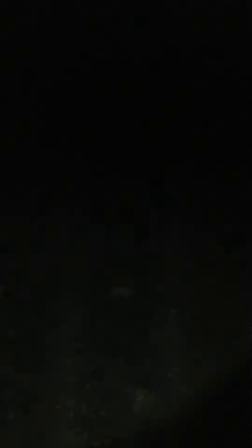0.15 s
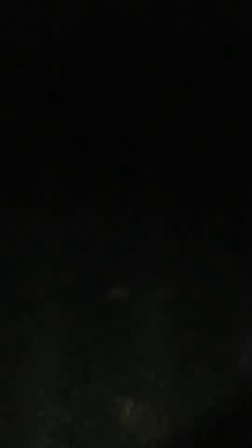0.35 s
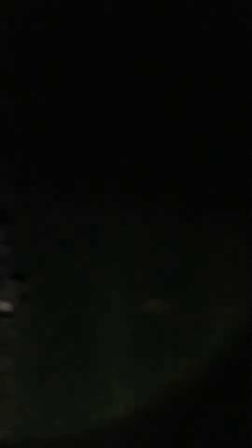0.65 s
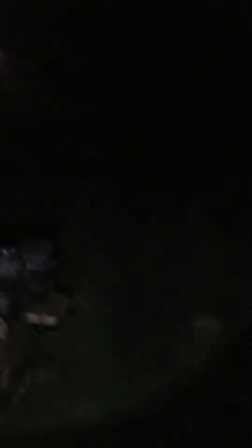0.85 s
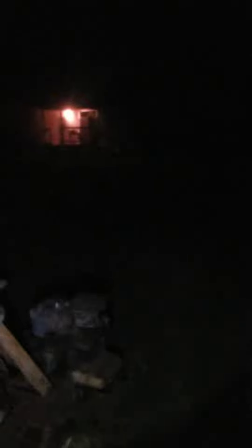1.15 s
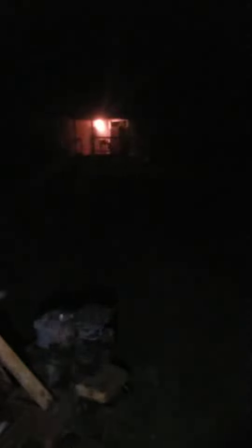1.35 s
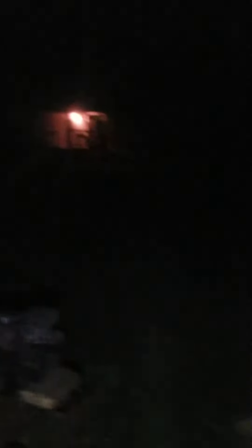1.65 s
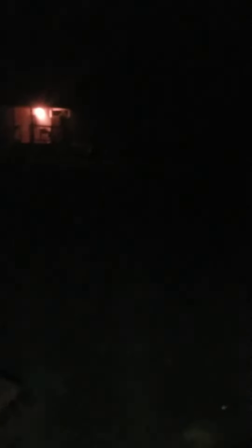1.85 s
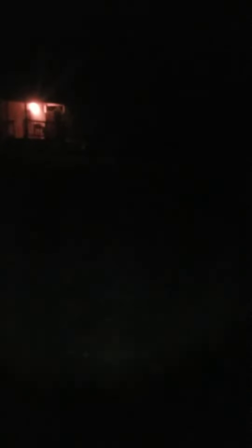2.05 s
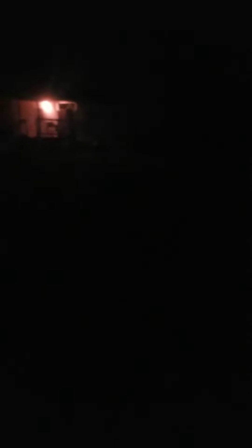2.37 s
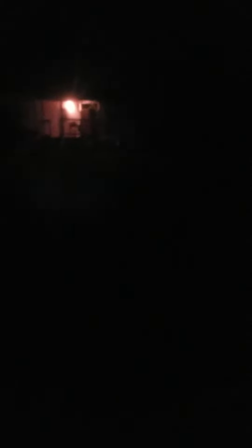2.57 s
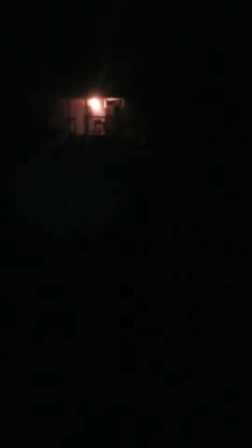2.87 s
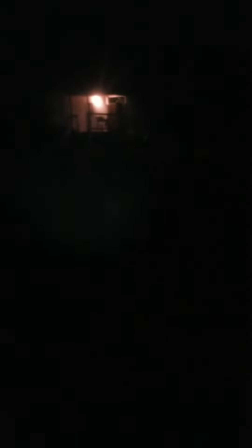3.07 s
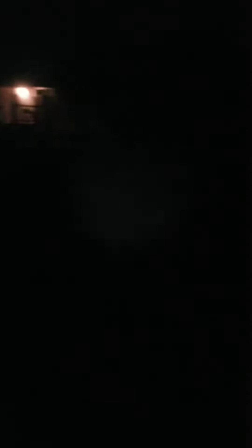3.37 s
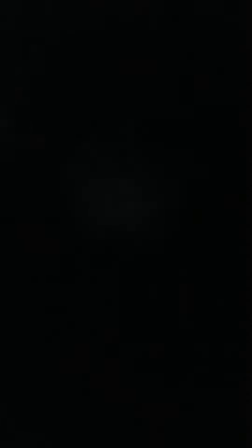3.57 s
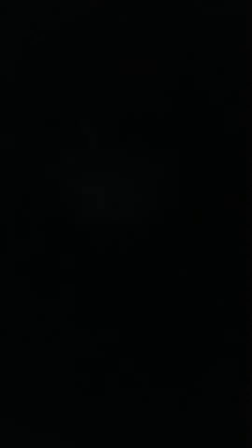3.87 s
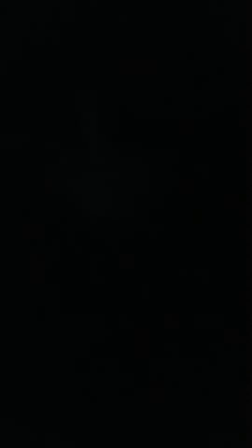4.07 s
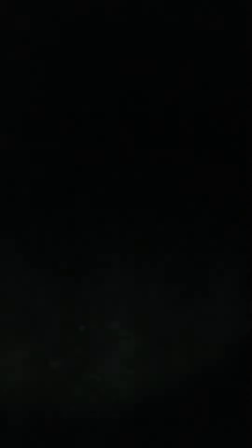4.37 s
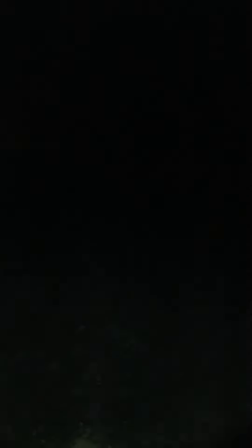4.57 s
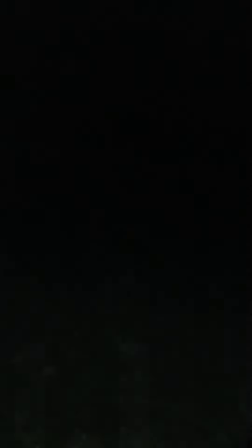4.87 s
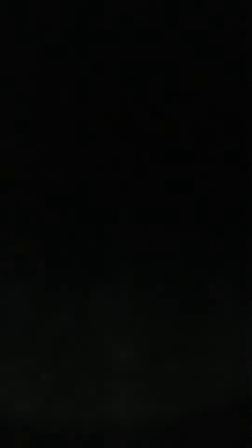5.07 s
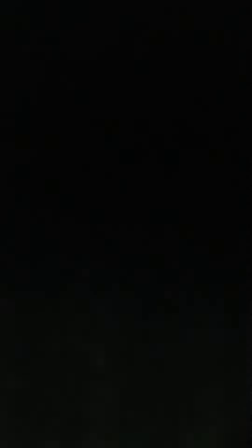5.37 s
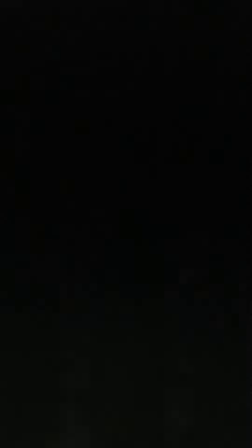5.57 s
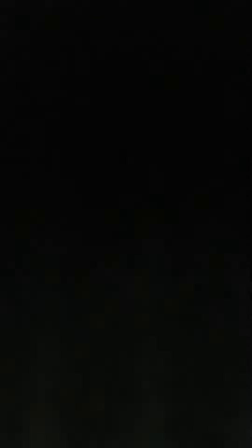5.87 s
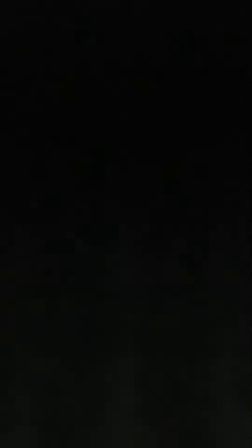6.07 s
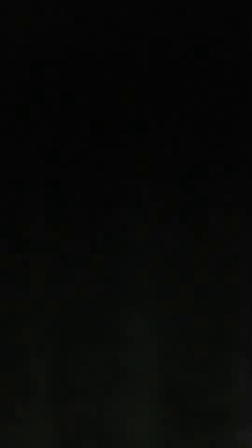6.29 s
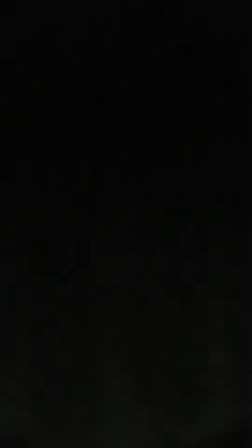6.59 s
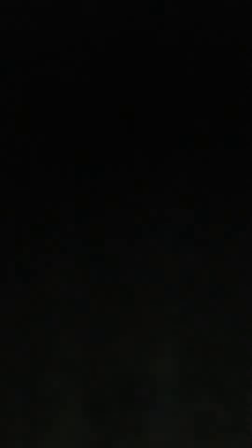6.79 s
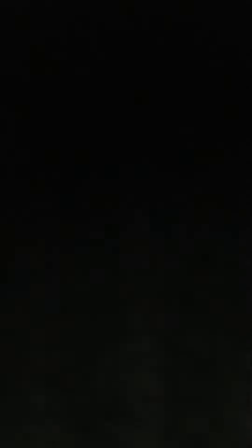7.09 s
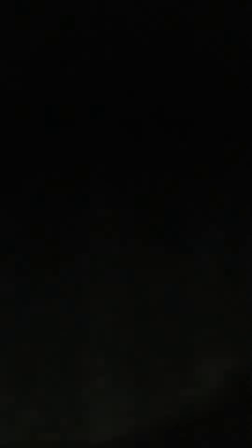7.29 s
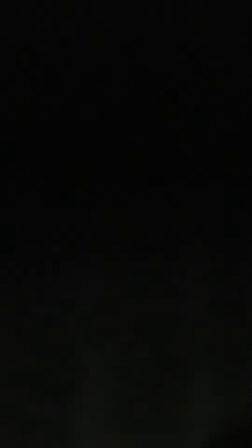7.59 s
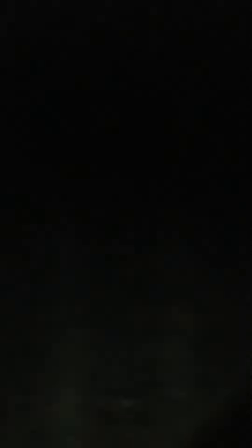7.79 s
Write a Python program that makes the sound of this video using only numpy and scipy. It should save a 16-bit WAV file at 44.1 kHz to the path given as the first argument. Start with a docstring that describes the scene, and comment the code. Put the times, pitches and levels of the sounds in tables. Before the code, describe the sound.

Steady shrill cricket chorus in a dark garden, broken by loud close clicks at the right, skin rustle, soft thuds and grassy steps.

```python
"""A field of crickets trilling near 4 kHz in a garden at night, with a walker close by in the grass throughout.
Fingers rub and knock on a hand-held phone, mostly by its right microphone port; a near, higher cricket sings two bouts.
Crickets are falling tone pulses blurred by foliage; grass, skin and grit are filtered random snaps;
knocks, thuds and clacks are struck resonances; the squeak is a sagging tone and the air is coloured noise."""
import sys
import numpy as np
from scipy import signal
from scipy.fft import rfft, irfft, next_fast_len
from scipy.io import wavfile

SR = 44100
rng = np.random.default_rng(int(sys.argv[2]) if len(sys.argv) > 2 else 0)


def inscribe(sig):
    """Save sig as 16-bit PCM at rate SR to the path in sys.argv[1].

    A 1-D sig is mono; a 2-D sig holds one channel per row.
    Samples are clipped to [-1, 1] before scaling.
    """
    pcm = np.round(np.clip(np.atleast_2d(sig).T, -1, 1) * 32767)
    wavfile.write(sys.argv[1], SR, pcm.astype(np.int16))


N = 350154  # length in samples


def from_db(db):
    """Decibels to gain."""
    return 10 ** (np.asarray(db) / 20)


def rms_one(x):
    """Scale to unit power over the whole signal."""
    return x / np.sqrt(np.mean(x ** 2) + 1e-20)


def clock():
    """Time of every sample in seconds."""
    return np.arange(N) / SR


def in_time(rows):
    """Each column of a curve at every sample; the end values hold outside it."""
    t, *columns = np.transpose(rows)
    return [np.interp(clock(), t, column) for column in columns]


def drift(rate):
    """Random wander between normal draws of spread 1, `rate` draws a second."""
    knots = rng.standard_normal(8192)
    return np.interp(clock() * rate, np.arange(len(knots)), knots)


def coloured(x, spectrum):
    """Filter a signal by a spectrum of (f/Hz, level/dB); unit power."""
    hz, db = np.transpose(spectrum)
    size = next_fast_len(N)
    bins_hz = np.fft.rfftfreq(size, 1 / SR)
    gain = from_db(np.interp(np.log(bins_hz + 1), np.log(hz), db))
    return rms_one(irfft(rfft(x, size) * gain, size)[..., :N])


def grains(per_s, spread_db):
    """Tiny snaps of uneven size at random moments; unit power."""
    sizes = from_db(spread_db * np.minimum(rng.exponential(1, N), 4)) * rng.standard_normal(N)
    return rms_one(sizes * (rng.random(N) < per_s / SR))


def ring(x, hz, width_hz):
    """One resonance; a wider one dies sooner."""
    r = np.exp(-np.pi * width_hz / SR)
    return signal.lfilter([1, 0, -1], [1, -2 * r * np.cos(2 * np.pi * hz / SR), r * r], x + 1e-18)


def struck(hz, width_hz, top_hz):
    """One touch on a resonance, dulled above top_hz; peak 1."""
    dull = signal.butter(2, min(top_hz, SR / 3), fs=SR, output="sos")
    sound = signal.sosfilt(dull, ring(signal.unit_impulse(SR // 6), hz, width_hz))
    return sound / np.abs(sound).max()


def rumble(hz, width_hz):
    """Dense soft bumps through the same resonance twice; unit power."""
    bumps = grains(per_s=1500, spread_db=1.0)
    return rms_one(ring(ring(bumps, hz, width_hz), hz, width_hz))


def gestures(rows, attack_s, release_s, arch_db):
    """Gain of (start, length, dB) movements: the ends lie arch_db below the middle; attack and release span 20 dB."""
    t, power = clock()[::20], 0
    for start, length, db in rows:
        place = np.clip((t - start) / length, 0, 1)
        before = np.maximum(start - t, 0) / attack_s
        after = np.maximum(t - start - length, 0) / release_s
        level_db = db - arch_db * (2 * place - 1) ** 2 - 20 * np.minimum(before + after, 10)
        power = power + from_db(level_db) ** 2
    return np.interp(clock(), t, np.sqrt(power))


def add(out, t, sound):
    """Mix a sound in at t seconds."""
    start = round(t * SR)
    out[..., start:start + sound.shape[-1]] += sound[..., :N - start]


def foliage(x, t60, scatter_db):
    """The direct sound reaches the two ports a little apart; leaves and ground scatter a short tail to each."""
    t = np.arange(SR // 4) / SR
    tail = rng.standard_normal((2, len(t))) * from_db(-60 * t / t60)
    paths = from_db(scatter_db) * tail / np.sqrt(np.sum(tail ** 2, axis=1, keepdims=True))
    paths[[0, 1], rng.integers(0, 18, 2)] += 1  # direct sound, delayed by up to 17 samples
    return signal.fftconvolve(x[None], paths, axes=1)[:, :N] / np.sqrt(1 + from_db(2 * scatter_db))


def wing(strokes, hz, duty, fall, overtone_db, edge=2):
    """Each closing of the wings draws the file over the scraper: a tone pulse that falls as the wing slows."""
    place = np.clip((strokes - np.round(strokes)) / min(duty, 1), -.5, .5)  # -.5 to .5 through a pulse
    phase = 2 * np.pi * np.cumsum(hz * (1 - fall * place)) / SR
    tone = np.sin(phase) + from_db(overtone_db) * np.sin(3 * phase)
    return rms_one(np.abs(np.cos(np.pi * place)) ** edge * tone)


# Far crickets across the garden, before the chorus's 2 dB lift: t/s, level/dB
CHORUS_LEVEL = [(0, -57), (1.6, -61), (2.1, -61.5), (3.0, -58), (4.4, -55.5), (5.3, -56), (5.7, -52.5),
                (6.1, -58.5), (6.5, -57.5), (7.94, -56)]
# Groups in the field, relative levels: wing tone f/Hz, strokes/(1/s), level/dB
CHORUS_GROUPS = [(3510, 62, -15), (3764, 26, -7), (3910, 21, -1.5), (3945, 49, -2.5), (4040, 51, -4.5),
                 (4340, 87, -12.5), (5650, 83, -26.5)]


def chorus(count=3):
    """Several far crickets a group, each with its own pitch and pace, blurred by the foliage."""
    out = 0
    for hz, rate, db in CHORUS_GROUPS:
        group = 0
        for k in range(count):
            pace = rate * (1 + .03 * rng.standard_normal() + .04 * drift(4))
            pitch = hz * (1 + 0.015 * (k - (count - 1) / 2) + .011 * drift(40))
            strokes = rng.random() + np.cumsum(pace) / SR
            song = wing(strokes, pitch, duty=.55, fall=.11, overtone_db=-35.5)
            group = group + song * from_db(2.1 * drift(rate))  # strokes vary in strength
        out = out + from_db(db) * rms_one(foliage(group, t60=.2, scatter_db=0))
    return from_db(in_time(CHORUS_LEVEL)[0] + 2.0) * rms_one(out)


# One nearer cricket leads; its level is counted from CHORUS_LEVEL
LEAD_HZ, LEAD_STROKES_PER_S, LEAD_DB = 3952, 25, -2


def lead_cricket():
    """A clear trill of falling pulses follows the chorus level."""
    strokes = np.cumsum(LEAD_STROKES_PER_S * (1 + .05 * drift(7))) / SR
    pitch = LEAD_HZ * (1 + .014 * drift(30))
    song = wing(strokes, pitch, duty=.42, fall=.15, overtone_db=-40) * from_db(2 * drift(25))
    return from_db(in_time(CHORUS_LEVEL)[0] + LEAD_DB) * foliage(song, t60=.2, scatter_db=-2)


# One low-pitched cricket beside the path, before port offsets: t/s, level/dB
LOW_CRICKET_LEVEL = [(5.8, -60), (6.15, -51), (6.45, -52.5), (6.95, -53), (7.3, -52), (7.55, -53),
                     (7.8, -57)]


def low_cricket():
    """A single lower trill, faint at first, stands out as the walker comes near."""
    strokes = np.cumsum(23 * (1 + 0.073 * drift(5.9))) / SR
    pitch = 3630 * (1 + 0.011 * drift(40))
    song = wing(strokes, pitch, duty=0.49, fall=0.17, overtone_db=-40) * from_db(1.6 * drift(23))
    ports = from_db([[-1.5], [.5]])  # left, right
    return from_db(in_time(LOW_CRICKET_LEVEL)[0]) * foliage(song, t60=0.4, scatter_db=5.5) * ports


# Shrill overtone of the nearest trills: t/s, f/Hz, level/dB
OVERTONE_COURSE = [(1.0, 11530, -83), (4.0, 11450, -88), (5.8, 11500, -86.5), (6.3, 10920, -78.5),
                   (7.2, 11110, -81), (7.7, 11570, -81)]


def high_buzz():
    """A thin, wavering high tone pulses at about 24 wing strokes a second."""
    hz, db = in_time(OVERTONE_COURSE)
    strokes = np.cumsum(24 * (1 + .05 * drift(8.3))) / SR
    tone = wing(strokes, hz * (1 + .014 * drift(900)), duty=.55, fall=.06, overtone_db=-60)
    return foliage(from_db(db) * tone, t60=0.095, scatter_db=3.5)


# Spectrum of the open night air: f/Hz, level/dB
AIR_SPECTRUM = [(20, -4), (45, -3), (95, 2.5), (160, -8), (280, -20.5), (600, -25), (3000, -25.5),
                (5500, -20), (8000, -32), (11500, -26.5), (15500, -28)]
AIR_DB = -65


def night_air():
    """A far rumble and a faint even hiss, mostly independent at the two ports."""
    separate, shared = rng.standard_normal((2, N)), rng.standard_normal(N)
    return from_db(AIR_DB) * coloured(separate + 0.17 * shared, AIR_SPECTRUM)


# Fingers sliding on the case by the right port, before lifts: start t/s, length t/s, rasp level/dB, hiss level/dB
FINGER_RUBS = [(0, 1.65, -79, -66.5), (0.377, 0.15, -64, -57.5), (0.542, 0.12, -73, -66.5),
               (1.024, 0.1, -73, -64), (1.719, 0.67, -69, -66.5), (2.04, 0.086, -48, -52),
               (2.499, 0.29, -85.5, -77.5), (3.201, 0.14, -73, -79.5), (3.76, 0.035, -66, -67),
               (3.83, 0.13, -67, -77), (3.955, 0.35, -73.5, -73.5), (4.338, 0.097, -57, -64),
               (5.788, 0.41, -74, -60.5), (5.986, 0.14, -65.5, -77), (6.205, 1.74, -81.5, -73),
               (6.85, 0.49, -76.5, -67), (7.166, 0.055, -58.5, -59.5), (7.273, 0.13, -63.5, -67),
               (7.606, 0.14, -91, -65), (7.702, 0.071, -55, -57)]
# A fingertip skidding after a knock, level before its decay shape: t/s, length t/s, level/dB
FINGER_SKIDS = [(2.208, 0.044, -34.5), (2.294, 0.015, -40), (2.332, 0.031, -36)]
# Spectrum of firm skin on the case: f/Hz, level/dB
RASP_SPECTRUM = [(40, -3), (150, 2), (350, -2), (700, 1.5), (1800, 0), (3000, 2.5), (4200, -5.5),
                 (5400, 5.5), (6600, -6.5), (7700, -19), (10000, -12), (16000, -32.5)]
# Spectrum of light skin on the case: f/Hz, level/dB
HISS_SPECTRUM = [(1500, -21), (4000, 2), (5400, 6.5), (6600, -2), (7800, -30.5), (9000, -12), (10500, -0.5),
                 (12000, 2.5), (13500, -5), (16000, -17.5)]


def rubbing():
    """Skin sticks and slips on the case: a rasp under pressure, a thin hiss when it is light."""
    start, length, rasp_db, hiss_db = np.transpose(FINGER_RUBS)
    firm = gestures(zip(start, length, rasp_db), attack_s=0.056, release_s=0.045, arch_db=3.5)
    light = gestures(zip(start, length, hiss_db), attack_s=0.071, release_s=0.032, arch_db=-1.0)
    catches = from_db(-9) * grains(per_s=90, spread_db=1.5)  # sparse snaps shared by rasp and hiss
    rasp_grain = coloured(grains(per_s=16000, spread_db=3.5) + catches, RASP_SPECTRUM)
    hiss_grain = coloured(grains(per_s=13000, spread_db=-2.5) + catches, HISS_SPECTRUM)
    rasp = firm * from_db(5.5 + drift(60)) * rasp_grain
    hiss = light * from_db(1.0 + 0.64 * drift(25)) * hiss_grain

    skid, knock_times = np.zeros(N), np.array(CASE_KNOCKS)[:, 0]
    for t, skid_s, db in FINGER_SKIDS:
        age = np.arange(SR // 8) / SR / skid_s  # in skid lengths
        bite = (1 + np.exp(-10 * age)) / (1 + age ** 12)  # strongest at first
        nearest_knock = knock_times[np.argmin(np.abs(knock_times - t))]
        add(skid, nearest_knock, from_db(db - 3.3 * age) * bite)
    scrape = coloured(grains(per_s=15000, spread_db=3.0), RASP_SPECTRUM)
    scrape = scrape + from_db(-2.0) * coloured(rng.standard_normal(N), HISS_SPECTRUM)
    return (rasp + hiss + skid * scrape) * from_db([[-30], [0]])


# The grip shifting by the right port: start t/s, length t/s, level/dB
GRIP_SHIFTS = [(2.06, .29, -50), (3.86, 0.097, -61), (4.345, .085, -49)]
# Muffled clothing round both ports: start t/s, length t/s, level/dB
CLOTH_SWISHES = [(1.8, 0.54, -74.5), (6.81, 0.031, -71.5), (7.22, 0.19, -65.5)]
CLOTH_REST_DB = -90  # the clothes never lie quite still


def handling():
    """The hand rolls on the case by the right port; clothing swishes round both."""
    grip = gestures(GRIP_SHIFTS, attack_s=0.068, release_s=.03, arch_db=2.5)
    grip = grip * rumble(hz=135, width_hz=160) * from_db([[-16], [0]])
    swish = gestures(CLOTH_SWISHES, attack_s=0.18, release_s=0.45, arch_db=3) + from_db(CLOTH_REST_DB)
    return grip + swish * np.array([rumble(hz=304, width_hz=230) for port in range(2)])


# A foot brushing through the grass, before a 3.5 dB lift: start t/s, length t/s, level/dB
GRASS_STEPS = [(.12, 0.59, -73), (1.04, 0.094, -66), (1.3, 0.39, -80), (1.9, 0.51, -70.5),
               (4.35, 0.13, -67), (5.83, 0.31, -68.5), (6.85, 0.52, -73), (7.22, 0.13, -63.5),
               (7.45, 0.38, -79)]
# Spectrum of the grass blades: f/Hz, level/dB
BLADE_SPECTRUM = [(60, 5), (250, 1), (600, 3), (1200, -7.5), (2400, -7.5), (4000, 4), (5500, -6.5),
                  (7500, -21.5), (11500, -13.5), (16000, -15)]


def footsteps():
    """Grass blades flick against the shoes in dense random snaps."""
    snaps = np.array([grains(per_s=7300, spread_db=1.0) for port in range(2)])
    brush = gestures(GRASS_STEPS, attack_s=0.14, release_s=0.087, arch_db=1.5)
    return brush * from_db(3.5) * coloured(snaps, BLADE_SPECTRUM)


# The palm on the case: t/s, right port peak level/dB, thud f/Hz, left port relative level/dB
PALM_BUMPS = [(0.646, -57, 228, -14), (5.445, -44, 130, -24), (5.944, -52, 72.3, 12.5),
              (6.992, -35, 154, -33), (7.013, -37.5, 128, -34)]
# Something hollow underfoot: t/s, right port peak level/dB
GROUND_CLACKS = [(.134, -53.5), (7.208, -47.5)]
CLACK_HZ, CLACK_WIDTH_HZ = 520, 110


def soft_blows():
    """Thuds of the palm on the case and hollow clacks from the ground, each a struck resonance."""
    out = np.zeros((2, N))
    for t, db, hz, left_db in PALM_BUMPS:
        thud = from_db(db) * struck(hz, hz * 0.48, hz * 1.32)
        add(out, t, -thud * from_db([[left_db], [0]]))
    for t, db in GROUND_CLACKS:
        clack = from_db(db) * struck(CLACK_HZ, CLACK_WIDTH_HZ, 1.5 * CLACK_HZ)
        add(out, t, clack * from_db([[-4], [0]]))
    return out


# A finger on the case by the ports: t/s, crack peak level/dB, ring f/Hz, ring width f/Hz,
# thud level/dB, thud f/Hz, left port relative level/dB
CASE_KNOCKS = [(1.0853, -33.5, 700, 1220, -47.5, 111, -22.5), (1.881, -39.5, 980, 2500, -61, 200, -17),
               (2.1622, -33, 870, 1480, -39, 139, -19), (2.2081, -6.5, 3000, 5000, -26.5, 293, -44),
               (2.2945, -2.5, 4940, 1880, -10, 1870, -47.5), (2.3338, -6.5, 2640, 1770, -20.5, 296, -28),
               (3.759, -35.5, 5170, 895, -74, 200, -32), (3.808, -34.5, 5250, 1100, -78, 200, -25),
               (3.8453, -29.5, 410, 347, -46, 130, -37), (3.9217, -44, 380, 300, -46, 132, -31),
               (4.4039, -13.5, 1000, 2100, -34, 153, -42), (4.4157, -2.5, 4720, 1205, -26.5, 180.1, -18.5),
               (4.4219, -12, 3190, 704, -40, 59.6, -9.5), (6.092, -43, 780, 1100, -52.5, 110, -8)]


def knocks():
    """A contact rings the port briefly and shakes the case with a low thud; contacts with a lower ring are duller."""
    out = np.zeros((2, N))
    port = signal.butter(6, 6600, fs=SR, output="sos")
    for t, db, hz, width_hz, thud_db, thud_hz, left_db in CASE_KNOCKS:
        crack = signal.sosfilt(port, struck(hz, width_hz, 1.9 * hz))
        upper = ring(ring(crack, 12000, 5000), 12000, 5000)  # the port's upper resonance
        crack = crack + from_db(-24) * upper
        thud = from_db(thud_db) * struck(thud_hz, thud_hz * 1.0, thud_hz * 1.1)
        knock = from_db(db) * crack / np.abs(crack).max() + thud
        add(out, t, -knock * from_db([[left_db], [0]]))
    return out


# The close cricket's bouts: start t/s, wing strokes, initial flatness f/Hz, initial softness level/dB
CLOSE_BOUTS = [(1.975, 37, 90, 5), (4.052, 43, 380, 10)]
# Every bout starts at the same pace and slows evenly
STROKES_PER_S, SLOWING_PER_S2 = 44, 3
# Each pulse falls by this share of its pitch, more steeply as the bout goes on
FALL, FALL_GROWTH_PER_S = 0.21, 0.069
# Pitch and level warm up, then the level fades; CLOSE_DB applies before sharing power among bouts
CLOSE_HZ, WARM_UP_S = 4835, .16
CLOSE_DB, FADE_DB_PER_S = -61, 4.5


def close_cricket():
    """Bouts of clear, steeply falling pulses; the tone climbs as the wings warm up and the pace slackens."""
    song = 0
    for start, count, flat_hz, soft_db in CLOSE_BOUTS:
        age = np.clip(clock() - start, -1, 2)
        strokes = STROKES_PER_S * age - .5 * SLOWING_PER_S2 * age ** 2
        strokes = np.clip(strokes, -.5, count - .5)  # silent outside the bout
        cold = np.exp(-np.maximum(age, 0) / WARM_UP_S)
        pitch = (CLOSE_HZ - flat_hz * cold) * (1 + .009 * drift(60))
        fall = FALL + FALL_GROWTH_PER_S * age
        pulses = wing(strokes, pitch, duty=.68, fall=fall, overtone_db=-40, edge=1.5)
        song = song + pulses * from_db(CLOSE_DB - soft_db * cold - FADE_DB_PER_S * age)
    song = song * from_db(1.8 * drift(60)) / np.sqrt(len(CLOSE_BOUTS))
    return foliage(song, t60=.25, scatter_db=-6)


# A sole scraping on grit, level at the right port mid-scrape: start t/s, length t/s, level/dB
SOLE_SCUFFS = [(4.232, 0.062, -62), (4.33, 0.022, -51)]
SCUFF_HZ, SCUFF_WIDTH_HZ = 3060, 1200


def scuffs():
    """Grit grinds under a sole: random snaps through a broad resonance, twice."""
    grit = []
    for port in range(2):
        snaps = ring(grains(per_s=2200, spread_db=0.0), SCUFF_HZ, SCUFF_WIDTH_HZ)
        grit.append(rms_one(ring(snaps, SCUFF_HZ, SCUFF_WIDTH_HZ)))
    scrape = gestures(SOLE_SCUFFS, attack_s=0.023, release_s=0.074, arch_db=-2)
    return scrape * np.array(grit) * from_db([[-6], [0]])


# A faint squeak, before scatter: start t/s, length t/s, initial pitch f/Hz, peak level/dB, raggedness (0-1)
SQUEAK_PARTS = [(5.795, 0.038, 1920, -53.5, 0.08), (5.821, .075, 1900, -62, 0.2)]
SQUEAK_SAG_HZ_PER_S = 4100


def squeak():
    """A faint squeak in two sagging parts, the second one more ragged."""
    out = 0
    for start, length, hz, db, ragged in SQUEAK_PARTS:
        age = np.clip(clock() - start, 0, length)
        pitch = (hz - SQUEAK_SAG_HZ_PER_S * age) * (1 + ragged * drift(700))
        phase = 2 * np.pi * np.cumsum(pitch) / SR
        out = out + from_db(db) * np.sin(np.pi * age / length) * np.sin(phase)
    return foliage(out, t60=.15, scatter_db=-8)


# The level of insects and air dips after the loud knocks, then mostly recovers: t/s, level/dB
BACKGROUND_GAIN = [(2.3, -0.5), (2.5, -6), (2.85, -9.5), (3.35, -10), (3.75, -3)]


def scene():
    """Insects and air all round, the walker close by."""
    night = chorus() + lead_cricket() + low_cricket() + high_buzz() + night_air() + close_cricket()
    walker = rubbing() + handling() + footsteps() + soft_blows() + knocks() + scuffs() + squeak()
    return from_db(in_time(BACKGROUND_GAIN)[0]) * night + walker


CUTOFF_HZ = 15850


def record(dry):
    """Full scale limits the peaks; a steep low-pass filter then cuts the top."""
    top = signal.ellip(12, .1, 80, CUTOFF_HZ, fs=SR, output="sos")
    return signal.sosfilt(top, np.clip(dry, -1, 1))


dry = scene()
out = record(dry)
inscribe(out)
```